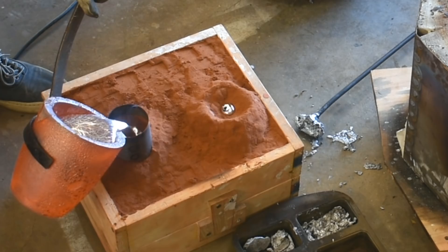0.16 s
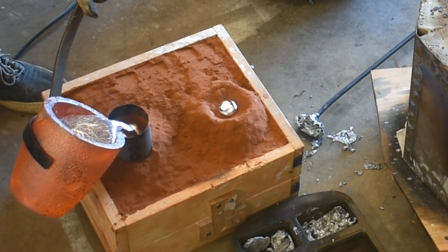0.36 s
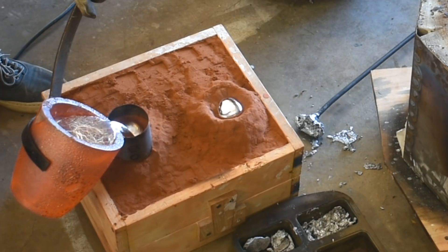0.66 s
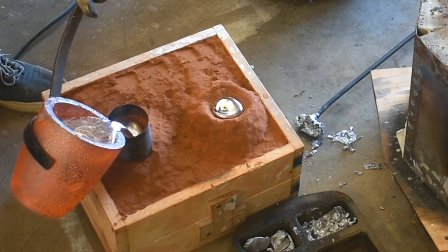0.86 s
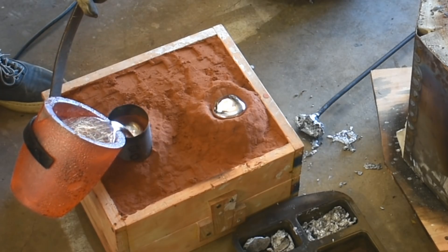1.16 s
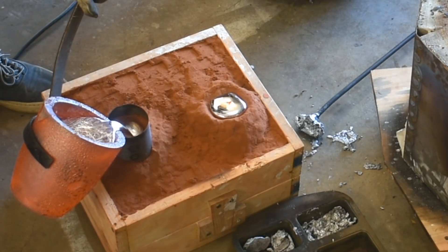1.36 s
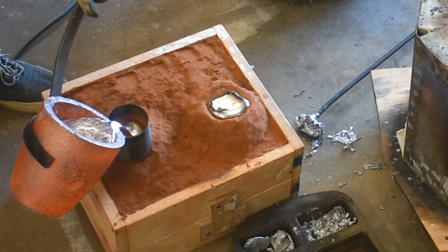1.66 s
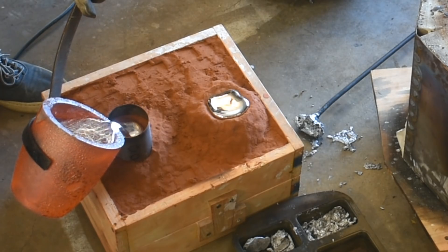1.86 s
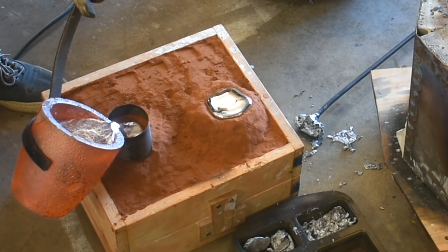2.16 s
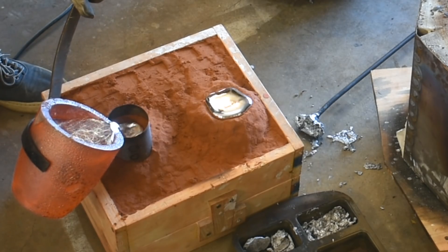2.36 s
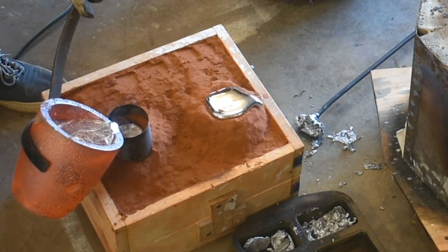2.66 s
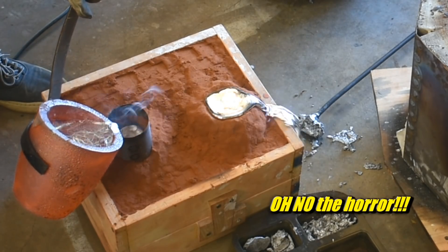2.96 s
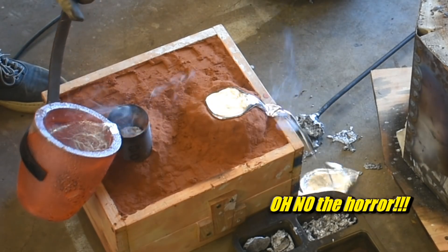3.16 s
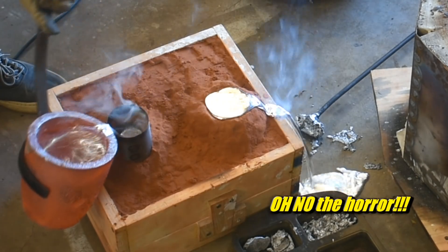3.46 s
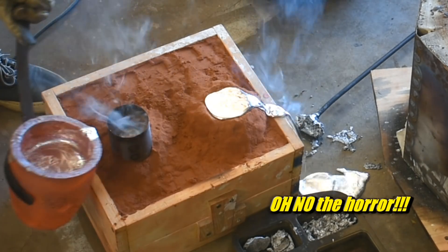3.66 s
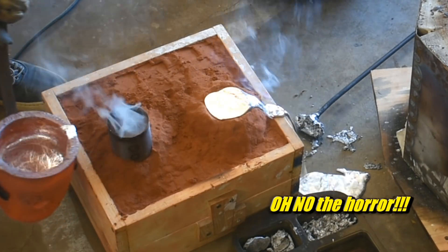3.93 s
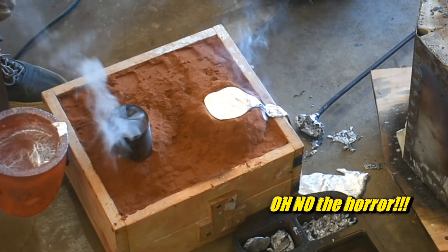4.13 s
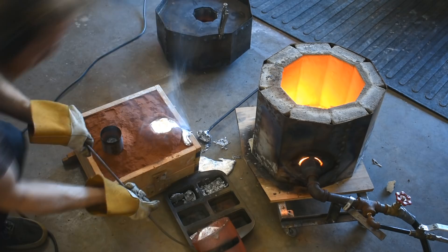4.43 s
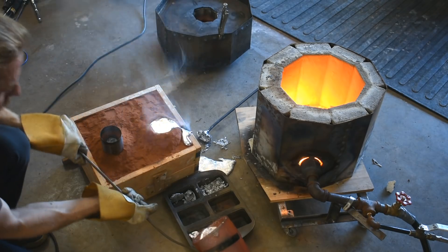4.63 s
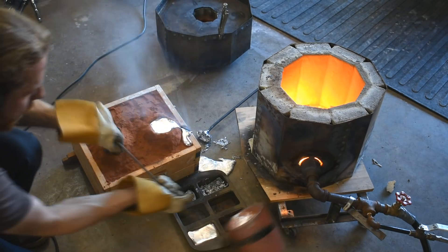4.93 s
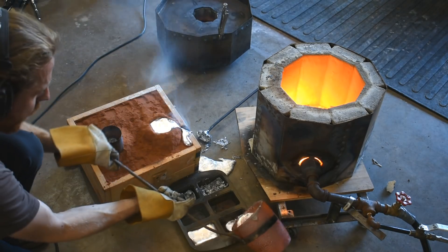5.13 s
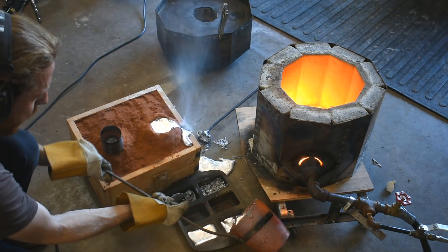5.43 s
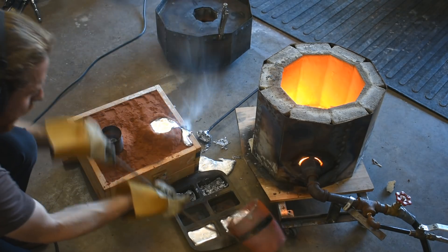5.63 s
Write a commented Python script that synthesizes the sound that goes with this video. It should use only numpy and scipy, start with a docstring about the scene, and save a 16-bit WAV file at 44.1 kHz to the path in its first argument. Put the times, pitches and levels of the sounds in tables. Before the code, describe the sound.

A gas burner roars with a steady breathy rush in a garage, a thin blower whine behind it, then abruptly turns quieter and duller.

```python
"""A blown gas burner roars into a small furnace in a garage: noise with gusting bands, coloured by
resonances of pipe, furnace and room and blurred by the garage's reflections.
Behind it the blower whines: sine tones on multiples of one slowly drifting pitch. The level dips briefly
once; later, at an edit cut, the sound drops for an instant and goes on quieter and duller, as from further off.
The microphone loses the deep bass; the recorder rounds the tallest peaks and cuts the top."""
import sys
import numpy as np
from scipy import signal
from scipy.fft import rfft, irfft
from scipy.io import wavfile
from scipy.ndimage import uniform_filter1d

SR = 44100
rng = np.random.default_rng(int(sys.argv[2]) if len(sys.argv) > 2 else 0)


def to_wav(sig):
    """Store sig (one row per channel, or 1-D mono) as 16-bit WAV at the path in sys.argv[1].

    Samples outside -1..1 are clipped; the rate is SR.
    """
    pcm = np.clip(np.atleast_2d(sig), -1, 1) * 32767
    pcm = np.round(pcm).astype(np.int16)
    wavfile.write(sys.argv[1], SR, pcm.T)  # frames by channels


N = 255339  # length in samples
CUT_S = 4.553  # edit cut: "near" sound before it, "far" sound (as from further off) after it


def undb(db):
    """Turn a level in dB into an amplitude gain."""
    return 10 ** (np.asarray(db) / 20)


def random_walk(rate_hz):
    """Wander smoothly: random levels held for 1 / rate_hz seconds, averaged twice; spread near 1."""
    hold = int(SR / rate_hz)
    steps = np.repeat(rng.standard_normal(N // hold + 1), hold)
    smooth = uniform_filter1d(uniform_filter1d(steps, hold), hold)
    return 1.29 * smooth[:N]


def garage(x, t60_s=.3, reflections_db=-10.0, diffuse_hz=700):
    """Add a decaying cloud of reflections to the direct sound, which ripples the spectrum finely."""
    s = np.arange(SR // 2) / SR
    decay = np.exp(-np.log(1000) * s / t60_s)
    response = rng.standard_normal(len(s)) * decay * (s > .003)
    # no cloud in the bass: lower down the room has separate modes
    high_pass = signal.butter(2, diffuse_hz, "high", fs=SR, output="sos")
    response = signal.sosfilt(high_pass, response)
    response *= undb(reflections_db) / np.sqrt(np.sum(response ** 2))
    response[0] = 1  # direct sound
    return irfft(rfft(x) * rfft(response, N), N)  # circular: the rush was sounding before the start


# Pitch of the blower whine, drifting with its load: t/s, f/Hz
BLOWER_PITCH = [(0, 1417.9), (.7, 1417.0), (1.4, 1418.0), (2.05, 1417.5), (2.5, 1418.7), (3.3, 1417.4),
                (3.87, 1418.8), (4.45, 1416.5), (4.55, 1417.0), (4.65, 1418.2), (5.79, 1418.4)]
# Whine tones whose levels drift along a curve: t/s, then level/dB of multiples 1, 2, 4 and 6
DRIFTING_TONES = [(0, -41, -39.5, -45, -68), (.9, -41, -40, -43, -70), (1.5, -41, -38, -42.5, -70),
                  (2.2, -41, -39.5, -42.5, -66), (2.4, -40.5, -39.5, -47, -66),
                  (3.5, -40, -39.5, -46.5, -67), (3.9, -39, -41.5, -44, -68),
                  (4.54, -39.3, -41.5, -43, -64), (4.6, -42.5, -47, -47, -67), (4.95, -41.5, -51, -49, -71),
                  (5.2, -40.5, -46.5, -50, -66), (5.4, -47.5, -49.5, -51, -62), (5.55, -45, -43, -51, -62),
                  (5.79, -41.5, -46.5, -49, -62)]
# Whine tones with one level before and one after the cut: multiple, near level/dB, far level/dB
STEADY_TONES = [(.5, -55, -64), (3, -63, -68), (5, -74, -72), (8, -69, -71)]


def blower(t, wobble_hz=.15, waver_db=.75):
    """Sound clean tones locked to the impeller's speed; each wavers in the room, the high ones most."""
    near = t < CUT_S
    pitch_hz = np.interp(t, *np.transpose(BLOWER_PITCH)) + wobble_hz * random_walk(25.03)
    phase = 2 * np.pi * np.cumsum(pitch_hz) / SR
    times, *levels = np.transpose(DRIFTING_TONES)
    tones = [(k, np.interp(t, times, db)) for k, db in zip((1, 2, 4, 6), levels)]
    tones += [(k, np.where(near, near_db, far_db)) for k, near_db, far_db in STEADY_TONES]
    waver_db = waver_db * np.where(near, 1, 2)  # livelier from further off
    whine = 0
    for k, db in tones:
        wavering_db = db + waver_db * np.sqrt(k) * random_walk(8.0)
        tone = np.sin(k * phase + rng.uniform(0, 2 * np.pi))
        whine = whine + np.sqrt(2) * undb(wavering_db) * tone  # the levels are rms
    return whine


def turbulence(swell_db=-0.25, flicker_db=0.62, puff_db=2.5):
    """Stir white noise: overlapping bands swell together and flicker alone; the bass comes in puffs."""
    spectrum = rfft(rng.standard_normal(N))
    octave = np.log2(np.maximum(np.arange(N // 2 + 1) * SR / N, 1))
    out, swell = 0, random_walk(3.18)
    for centre in range(4, 16):  # band centres at 2 ** centre Hz
        share = np.clip(1 - np.abs(octave - centre), 0, 1)  # neighbouring shares sum to one
        own_db = puff_db if centre < 8 else flicker_db
        gust = undb(swell_db * swell + own_db * random_walk(9.0))
        out = out + irfft(spectrum * share, N) * gust
    return out


# Resonances of pipe, furnace and room: f/Hz, width/Hz, level/dB (boost, or cut where negative)
RESONANCES = [(79, 17, 7), (154, 25, 1.5), (286.6, 27, 4.5), (337, 19, 1), (384, 38, 7.5), (465, 19, 5.5),
              (550, 15, 3.5), (600, 34, -5), (646, 30, 5), (904, 27, 1.5), (949, 120, 3.5),
              (1115, 110, -3.5), (1314, 80, 2), (1350, 26, -4), (1727, 33, 3), (1833, 69, 6),
              (1960, 130, 4.5), (2050, 120, 1), (2450, 36, 0), (3617, 390, 6), (3880, 150, 1),
              (6410, 66, -8), (6450, 80, 5.5), (7400, 66, -3), (8350, 170, -3), (9700, 130, 3),
              (10000, 280, 2.5), (10400, 120, 3.5), (10700, 370, 6.5)]


def coloured(x, colour, hiss_top_hz=11020):
    """Give the noise its smooth colour, then the boosts and cuts of the resonances; rms 1."""
    hz = np.maximum(np.arange(N // 2 + 1) * SR / N, 1)
    points_hz, points_db = np.transpose(colour)
    db = np.interp(np.log(hz), np.log(points_hz), points_db, right=-120)
    for centre_hz, width_hz, boost_db in RESONANCES:
        db += boost_db / (1 + (2 * (hz - centre_hz) / width_hz) ** 2)
    db -= 40 * np.clip((hz - hiss_top_hz) / 250, 0, 1)  # the hiss ends below the highest whine tone
    y = irfft(rfft(x) * undb(db), N)
    return y / np.std(y)


# Smooth colour of the rush before the cut: f/Hz, relative level/dB per Hz
NEAR_COLOUR = [(35, -59), (60, -26), (373, -3), (590, -9.5), (1320, -6.5), (1410, -4.5), (2230, -10.5),
               (2770, -10), (4280, -16), (5800, -17), (6330, -25.5), (7530, -20.5), (9160, -27.5),
               (10900, -29), (14200, -58), (22000, -120)]
# Smooth colour of the rush after the cut, as from further off: f/Hz, relative level/dB per Hz
FAR_COLOUR = [(35, -57), (60, -25.5), (365, -4.5), (590, -12), (1180, -9), (1410, -5), (1570, -10),
              (2230, -13.5), (2770, -12), (4470, -19), (5800, -18), (6330, -28), (7690, -23.5),
              (10900, -33), (14200, -71), (22000, -120)]


def burner_rush(t, near_db=-31.5, far_db=-36):
    """Roar of flame and hiss of air from one turbulence; level and colour change at the cut."""
    eddies = garage(turbulence())
    far = np.clip((t - CUT_S) / .004, 0, 1)  # crossfade over 4 ms
    near_rush = undb(near_db) * coloured(eddies, NEAR_COLOUR)
    far_rush = undb(far_db) * coloured(eddies, FAR_COLOUR)
    return (1 - far) * near_rush + far * far_rush


# Brief drops of the whole level, a dip and the drop at the cut:
# t/s, level/dB of the drop, fall/s, recovery time constant/s
LEVEL_DROPS = [(3.492, -3, 0.0048, 0.04), (4.552, -7.5, .003, 0.0099)]


def level_drops(t):
    """Gain that falls fast, then recovers exponentially."""
    db = 0
    for start_s, depth_db, fall_s, recovery_s in LEVEL_DROPS:
        fall = np.clip((t - start_s) / fall_s, 0, 1)
        recovery = np.exp(-np.maximum(t - start_s - fall_s, 0) / recovery_s)
        db = db + depth_db * fall * recovery
    return undb(db)


def scene():
    """Burner rush and blower whine in the garage, dropping together; one channel."""
    t = np.arange(N) / SR
    mix = burner_rush(t) + blower(t)
    return (mix * level_drops(t))[None]


def record(dry, low_cut_hz=70, ceiling=.111, top_hz=11400):
    """The microphone drops the deep bass; the recorder rounds the tallest peaks and cuts the top."""
    microphone = signal.butter(4, low_cut_hz, "high", fs=SR, output="sos")
    thin = signal.sosfilt(microphone, dry)
    rounded = thin / (1 + (thin / ceiling) ** 6) ** (1 / 6)
    top_cut = signal.ellip(14, .2, 80, top_hz, fs=SR, output="sos")
    return signal.sosfilt(top_cut, rounded)


dry = scene()
out = record(dry)
to_wav(out)
```